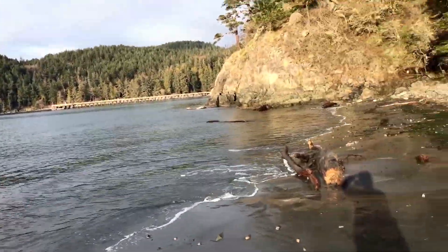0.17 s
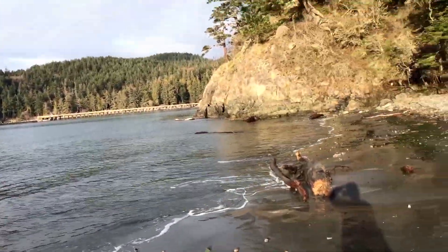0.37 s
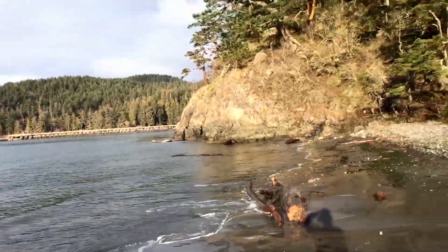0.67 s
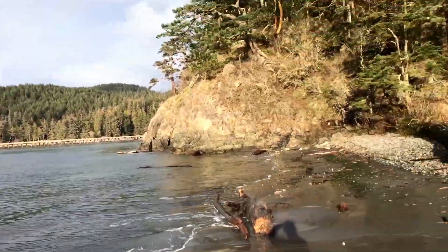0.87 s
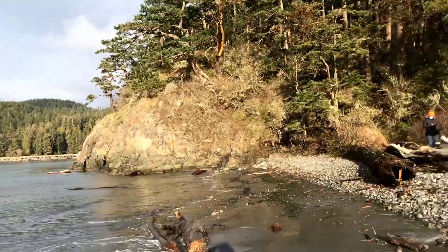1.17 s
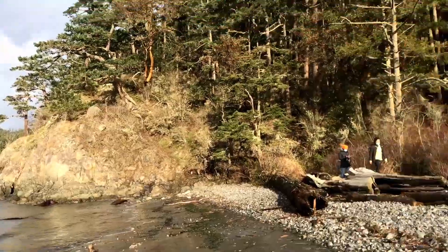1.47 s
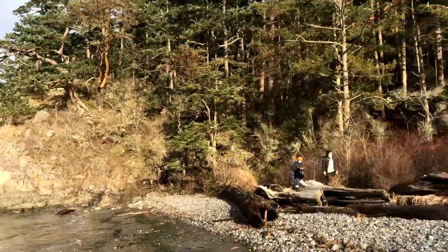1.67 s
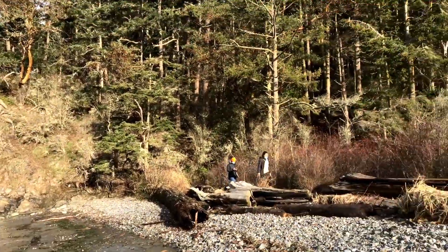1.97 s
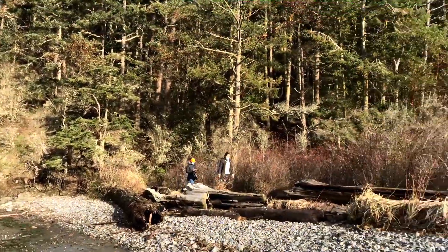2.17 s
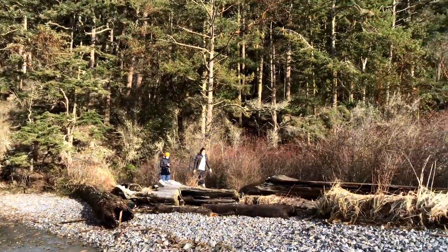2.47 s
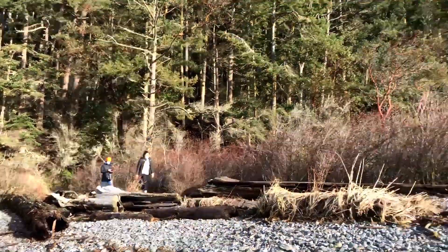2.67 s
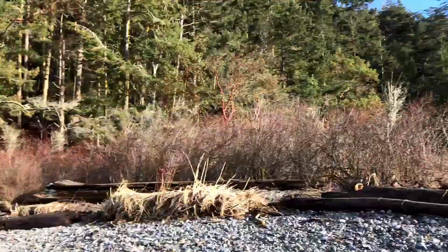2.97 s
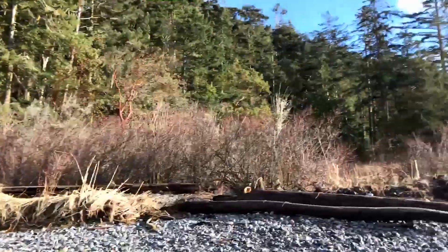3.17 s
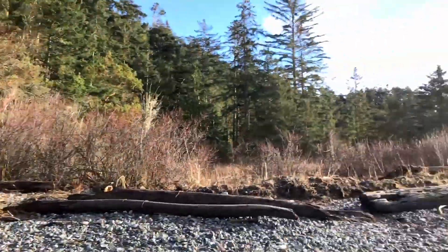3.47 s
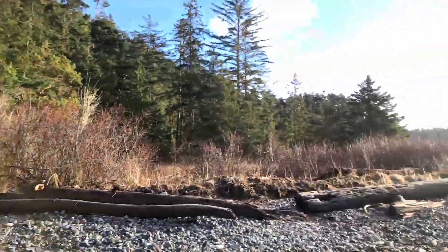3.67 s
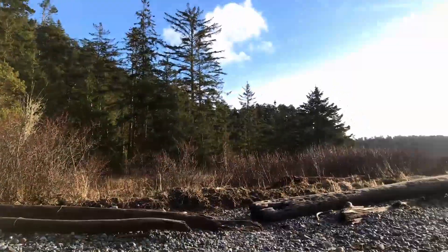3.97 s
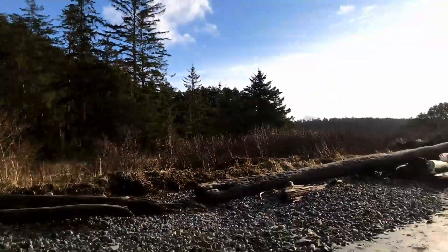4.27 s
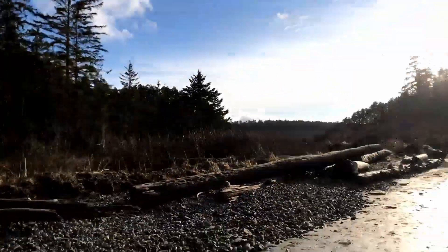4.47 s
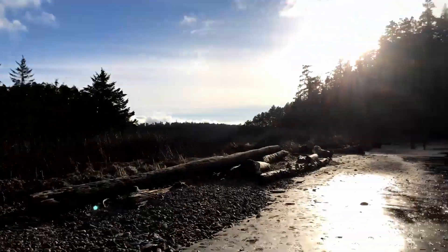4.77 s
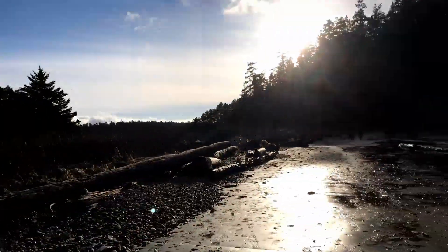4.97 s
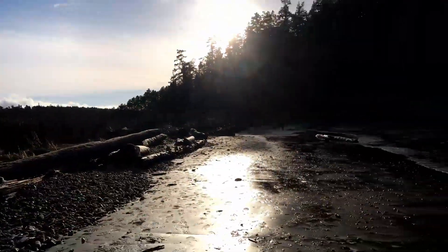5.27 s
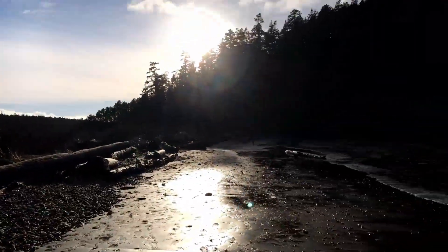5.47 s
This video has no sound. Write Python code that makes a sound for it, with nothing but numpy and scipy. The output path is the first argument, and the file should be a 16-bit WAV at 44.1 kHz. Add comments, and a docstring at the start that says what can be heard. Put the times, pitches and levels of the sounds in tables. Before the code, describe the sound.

Wind buffets the microphone while water drips and two gentle waves fizz up a beach, with occasional finger knocks on the case.

```python
"""Small waves on a sand and pebble shore, from a hand-held microphone near the water's edge.
Wind rumbles on the microphone throughout, and fingers knock on its case at the start. A ripple laps
and drips; more knocks follow, one with a nail. Near 2 s a wavelet rises, tumbles with trapped air,
fizzes up the beach as bursting foam and drains away, while the microphone turns from the water and
the spray dulls. Near 4 s a second wavelet comes in, with two last knocks on the case."""
import sys
import numpy as np
from scipy import signal
from scipy.io import wavfile

SR = 44100
rng = np.random.default_rng(int(sys.argv[2]) if len(sys.argv) > 2 else 0)


def wav_out(sig):
    """Save sig, one row per channel (or a flat mono array), as 16-bit PCM at SR to the path in sys.argv[1]."""
    wavfile.write(sys.argv[1], SR, np.round(np.clip(np.atleast_2d(sig).T, -1, 1) * 32767).astype(np.int16))


N = 247842
TIME = np.arange(N) / SR
CALM_DB = -54.5   # foam between the waves


def surf(calm_large_db=5.5, calm_churn_db=-59, crest_s=0.096):
    """Wavelets run up over calm water: curves of foam, large bubbles, churn (dB) and tumbling (0-1)."""
    # wavelets at the water's edge: (start [s], level [dB], rise [s], run up the beach [s],
    # sag on the way [dB/s], large bubbles against the foam [dB], churn against the foam [dB])
    wavelets = [(1.26, -52, .17, .17, 1, 0.5, -30), (1.89, -34, .47, 1.07, 1.48, 3, -7.5),
                (3.95, -37, .63, 1.3, 5.5, 6, -5.5)]
    drain, crest_fall = 19, 8   # dB/s: foam dies after the run up; trapped air escapes after the crest
    large_sag, large_drain = 3.95, 14.5   # dB/s: large bubbles thin out sooner but linger in the backwash
    rise_power, curl_power = 1.4, 2.4   # foam builds ever faster; air is trapped late in the rise
    foam, large, air = [from_db(CALM_DB)], [from_db(CALM_DB + calm_large_db)], [from_db(calm_churn_db)]
    tumbling = 0
    for start, db, rise_s, run_s, sag, large_db, churn_db in wavelets:
        foam.append(from_db(db) * swell(start, rise_s, run_s, sag, drain, rise_power))
        large_swell = swell(start, rise_s, run_s, sag + large_sag, large_drain, rise_power)
        large.append(from_db(db + large_db) * large_swell)
        air.append(from_db(db + churn_db) * swell(start, rise_s, crest_s, 0, crest_fall, curl_power))
        tumbling = tumbling + swell(start, rise_s, crest_s, 0, drain)
    return together_db(foam), together_db(large), together_db(air), tumbling


def wash(foam_db, large_db, spray_db, gain_db=2.24, patchy_db=0.62, surge_db=0.78):
    """Foam bursts on the sand; a stronger wash has more bubbles and so sounds smoother."""
    # spectrum of the foam: (frequency [Hz], relative density [dB])
    colour = [(800, -14.5), (1500, -7.5), (1900, -6), (2900, -0.5), (3500, -2.5), (4900, -6.5), (5500, -3),
              (6500, -5.5), (7700, -13), (9200, -11.5), (10400, -27), (11300, -25), (13300, -38.5),
              (16000, -36)]
    per_s = 420 * from_db(foam_db + 33)   # 420 bubbles a second in each band when foam_db is -33
    level_db = gain_db + foam_db + surge_db * drift(7.4)
    out = np.zeros(N)
    for edges, hz, gain in bands(colour, count=32):
        fine = np.clip(np.log(hz / 4100) / np.log(1.85), 0, 1)   # fine spray sits at the top
        large = np.clip(np.log(2900 / hz) / np.log(2.1), 0, 1)   # large bubbles ring low
        tint_db = fine * spray_db + large * (large_db - foam_db)
        share = 0.37 / (1 + (hz / 9000) ** 4)   # the finest fizz merges into hiss
        band_db = level_db + tint_db + patchy_db * drift(25)
        out += gain * from_db(band_db) * bubbles(edges, per_s, size_db=5.0, near_share=share)
    return out


def bubbles(edges, per_s, size_db, near_share):
    """Bubbles in one band: single near ones ring a few cycles over the blur of countless far ones."""
    born = np.flatnonzero(rng.random(N) < per_s / SR)
    sizes = from_db(size_db * np.minimum(rng.exponential(1, len(born)), 3))
    pops = rms_one(sizes * rng.choice([-1, 1], len(born)))
    bursts = np.sqrt(1 - near_share) * rng.standard_normal(N)
    bursts[born] += np.sqrt(near_share * SR / per_s[born]) * pops
    return rms_one(passed(bursts, edges, "band"))


def churn(level_db, gain_db=.5, patchy_db=2.3, per_s=200):
    """Clouds of trapped air throb under the crest."""
    # spectrum of the air clouds: (frequency [Hz], relative density [dB])
    colour = [(130, -1.5), (300, 3.5), (450, 0.5), (560, 1), (700, -9), (850, -2)]
    clouds = np.zeros(N)
    for edges, _, gain in bands(colour, count=7):
        throb = from_db(patchy_db * drift(18))
        clouds += gain * throb * bubbles(edges, np.full(N, per_s), size_db=-0.5, near_share=0.14)
    return from_db(level_db + gain_db) * clouds


def gurgles(band_hz=(2020, 2900), per_s=300):
    """Water folds over pockets of air, which break into bubbles of much the same size."""
    # air pockets: (time [s], level [dB], width [s])
    pockets = [(.37, -55, 0.025), (.84, -52, 0.038), (1.48, -52.5, 0.049), (2.29, -39, .03),
               (4.82, -41, 0.082)]
    level = sum(from_db(db) * bump(s, width) for s, db, width in pockets)
    return level * bubbles(band_hz, np.full(N, per_s), size_db=1.0, near_share=0.67)


def drops(foam_db, spray_db, tumbling, gain_db=0.5, patter_db=-40, spread_db=23, low_hz=1700, high_hz=9000):
    """A few clear drops stand out of a random patter that thickens under each crest."""
    # drops near the microphone: (time [s], level [dB], pitch [Hz], splash against the bubble [dB])
    near_drops = [(0.732, -29, 7000, -8), (1.166, -31.5, 2730, -22), (1.2677, -35, 2390, -6),
                  (1.381, -27, 6100, -3), (1.4245, -26.5, 5670, -3.5), (1.529, -25, 5560, -6),
                  (1.5569, -22.5, 3500, -6.5), (1.6328, -23, 6200, -10), (1.723, -28, 2540, -6.5),
                  (1.912, -31, 2750, 4.5), (1.9418, -35, 1880, 7), (2.025, -23, 3060, -5),
                  (2.422, -12.5, 5860, -23), (2.996, -13.5, 6700, -4)]
    out = np.zeros(N)
    for s, db, hz, splash_db in near_drops:
        add(out, s, from_db(db + gain_db) * droplet(hz, splash_db))
    per_s = 15 + 32 * tumbling
    loudest_db = patter_db + .45 * (foam_db - CALM_DB) + .6 * spray_db   # partly follows foam and spray
    for i in np.flatnonzero(rng.random(N) < per_s / SR):
        faintness, pitch = rng.random(2)
        hz = low_hz * (high_hz / low_hz) ** pitch
        gain = from_db(loudest_db[i] - spread_db * faintness)
        add(out, i / SR, gain * droplet(hz, splash_db=-12.0, splash_s=.0015))
    return out


def droplet(hz, splash_db, splash_s=0.0027, cycles=35, rise_per_s=3.0):
    """A drop splashes, then its bubble rings and rises in pitch."""
    t = np.arange(SR // 25) / SR
    splash = passed(rng.standard_normal(len(t)), [2300, 8500], "band", order=3) * np.exp(-t / splash_s)
    bubble = ring(t, hz * (1 + rise_per_s * t), cycles / hz) * (1 - np.exp(-t * hz / 2))
    return bubble + from_db(splash_db) * splash


def knocks(thump_t60_s=0.1, nail_s=1.8265, nail_db=-3.5, nail_hz=6500):
    """A soft fingertip rings the damped case and shoves the microphone; a nail adds a dry tick."""
    # fingers on the case: (time [s], ring level [dB], thump level [dB], contact sharpness [Hz],
    # ring length [factor], thump pitch [Hz])
    taps = [(0.1158, -16.5, -34, 1140, 2.1, 54), (0.1201, -15.5, -10, 1580, 3.7, 54),
            (0.1259, -20, -22, 1400, 3.1, 54), (.1320, -26, 0, 1100, 1.2, 47.3),
            (0.2108, -20, -12, 1690, 0.85, 55), (1.7515, -23.5, -39, 716, 1.1, 54),
            (1.8256, -10, -13, 2410, 0.47, 55), (1.846, -8, -9.5, 1280, 0.5, 54.7),
            (1.8671, -11.5, -15, 506, 0.37, 54), (4.543, -12.5, -12, 750, 1.47, 63.7),
            (5.0896, -9.5, -13, 1700, 0.56, 58)]
    # resonances of the case: (frequency [Hz], level [dB], t60 at ring length 1 [s])
    modes = [(135, -33.5, 0.2), (412, 1.5, 0.015), (591, -1, 0.016), (977, 0, 0.0039),
             (2300, -13.5, 0.0072)]
    out, t = np.zeros(N), np.arange(SR // 4) / SR
    for s, ring_db, thump_db, contact_hz, length, thump_hz in taps:
        case = sum((-1) ** k * from_db(db) * ring(t, hz, t60 * length)
                   for k, (hz, db, t60) in enumerate(modes))
        thump = from_db(thump_db) * ring(t, thump_hz, thump_t60_s)
        add(out, s, passed(from_db(ring_db) * case, contact_hz, "low") + passed(thump, 250, "low"))
    add(out, nail_s, from_db(nail_db) * passed(1.0 * (t == 0), nail_hz, "low"))
    return out


def wind(start_db=-28.5, ease_db_per_s=0.65, flutter_db=0.5):
    """Eddies buffet the microphone port; the breeze eases slowly, with a few gusts and lulls."""
    # spectrum of the rumble: (frequency [Hz], relative density [dB])
    colour = [(8.8, -82), (15, -4.5), (32, -0.5), (45, 1.5), (77, -19), (114, -18), (145, -38.5),
              (171, -46), (225, -42), (260, -40), (340, -69), (570, -120)]
    # gusts and lulls: (time [s], change of level [dB], width [s])
    gusts = [(.01, 4.5, 0.05), (.42, 2.5, 0.062), (1.35, -3.5, 0.04), (2.15, -5, 0.11), (2.55, 4, 0.04),
             (3.98, 1.5, 0.092), (5.15, 6, 0.14)]
    level_db = start_db - ease_db_per_s * TIME + sum(db * bump(s, width) for s, db, width in gusts)
    eddies = sum(gain * rms_one(passed(rng.standard_normal(N + SR), edges, "band", order=3)[SR:])
                 for edges, _, gain in bands(colour, count=10))
    return from_db(level_db + flutter_db * drift(10.0)) * eddies


def spits():
    """Brief swells of thin, high hiss."""
    # spits of hiss: (start [s], level [dB], length [s])
    swells = [(0.108, -47, 0.023), (2.98, -48, 0.023), (4.21, -53, 0.033), (4.626, -53, .07),
              (5.07, -57, .08), (5.227, -56, 0.055)]
    fizz = rms_one(passed(rng.standard_normal(N), [6000, 10500], "band"))
    level = np.zeros(N)
    for s, db, length in swells:
        add(level, s, from_db(db) * np.hanning(round(length * SR)))
    return level * fizz


def hiss(level_db=-63.5, turned_db=-11.0, turn_s=(2.4, 3.7)):
    """Faint airy hiss from the open water farther out, shaded once the microphone points inland."""
    # spectrum of the open water: (frequency [Hz], relative density [dB])
    colour = [(3000, -64), (9000, 32), (12000, 37), (16000, 14)]
    air = sum(gain * rms_one(passed(rng.standard_normal(N), edges, "band"))
              for edges, _, gain in bands(colour, count=5))
    return from_db(level_db + np.interp(TIME, turn_s, [0, turned_db])) * air


def swell(start, rise_s, hold_s, sag_db_per_s, fall_db_per_s, power=1):
    """A wave rises to 1, sags while it holds, then dies away."""
    age = TIME - start
    held, after = np.clip(age - rise_s, 0, hold_s), np.maximum(age - rise_s - hold_s, 0)
    return np.clip(age / rise_s, 0, 1) ** power * from_db(-sag_db_per_s * held - fall_db_per_s * after)


def bump(s, width_s):
    """A bell curve in time; top 1."""
    return np.exp(-.5 * ((TIME - s) / width_s) ** 2)


def drift(hz):
    """Slow random wander with spread 1, drawn every 40 samples."""
    pole = np.exp(-80 * np.pi * hz / SR)
    slow = signal.lfilter([1], [1, -2 * pole, pole * pole], rng.standard_normal(N // 40 + 2002))[2000:]
    return np.interp(np.arange(N) / 40, np.arange(len(slow)), rms_one(slow))


def ring(t, hz, t60):
    """A dying sine."""
    return np.sin(2 * np.pi * hz * t) * np.exp(-np.log(1000) * t / t60)


def bands(colour, count):
    """Cut a spectrum into bands: (edges [Hz], centre [Hz], gain), total power 1."""
    hz, db = np.transpose(colour)
    edges = np.geomspace(hz[0], hz[-1], count + 1)
    centres = np.sqrt(edges[1:] * edges[:-1])
    gains = from_db(np.interp(np.log(centres), np.log(hz), db)) * np.sqrt(np.diff(edges))
    return zip(zip(edges, edges[1:]), centres, gains / np.linalg.norm(gains))


def passed(x, hz, kind, order=2):
    """Butterworth filter."""
    sections = signal.butter(order, np.clip(hz, 10, .45 * SR), kind, fs=SR, output="sos")
    return signal.sosfilt(sections, x + 1e-18)


def add(out, s, sound):
    """Mix a short sound in at a time."""
    i = round(s * SR)
    out[i:i + len(sound)] += sound[:N - i]


def from_db(db):
    """Decibels to gain."""
    return 10 ** (np.asarray(db) / 20)


def together_db(gains):
    """Level of unrelated sounds heard together."""
    return 10 * np.log10(sum(gain ** 2 for gain in gains))


def rms_one(x):
    """Scale to unit power."""
    return x / np.sqrt(np.mean(x ** 2) + 1e-20)


def scene():
    """The waves drive foam, churn and droplets together; wind and handling join at the microphone."""
    # the spray is shaded as the microphone turns from the water: (time [s], fine spray level [dB])
    facing = [(0, 5), (1.55, 5), (2.12, 2.5), (3.05, -1.3), (3.85, -9), (4.22, -6.5), (4.55, -8),
              (5.62, -10)]
    spray_db = np.interp(TIME, *np.transpose(facing))
    foam_db, large_db, churn_db, tumbling = surf()
    water = wash(foam_db, large_db, spray_db) + churn(churn_db) + gurgles()
    water += drops(foam_db, spray_db, tumbling)
    return (water + spits() + hiss() + wind() + knocks())[None]


def record(dry, fade_s=.005, cutoff_hz=15900):
    """The mono microphone signal fades in quickly and its top is cut steeply."""
    opening = np.minimum(TIME / fade_s, 1)
    return signal.sosfilt(signal.ellip(10, .1, 80, cutoff_hz, fs=SR, output="sos"), dry * opening)


dry = scene()
out = record(dry)
wav_out(out)
```